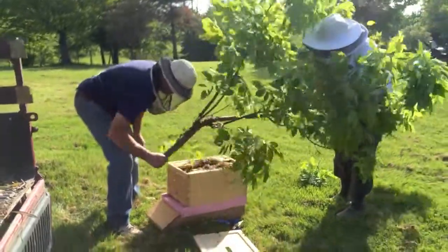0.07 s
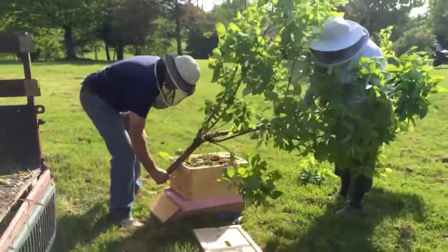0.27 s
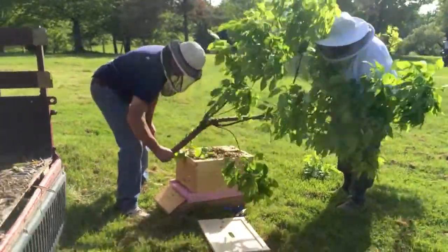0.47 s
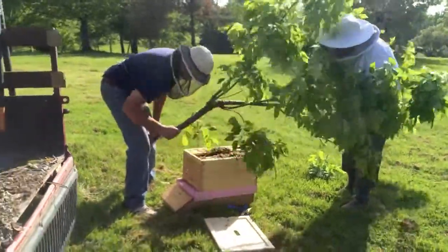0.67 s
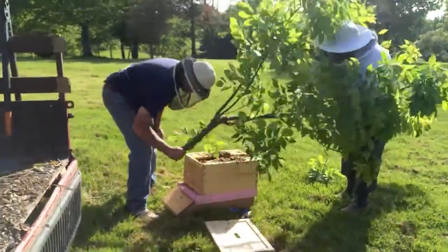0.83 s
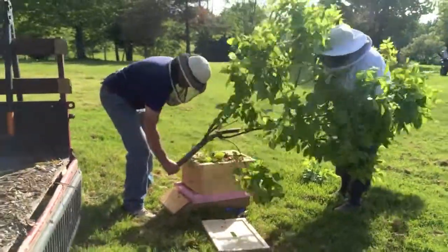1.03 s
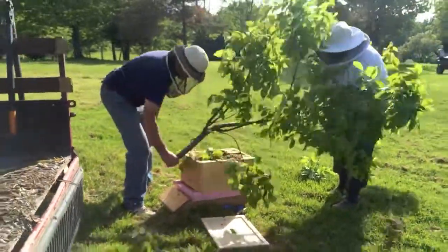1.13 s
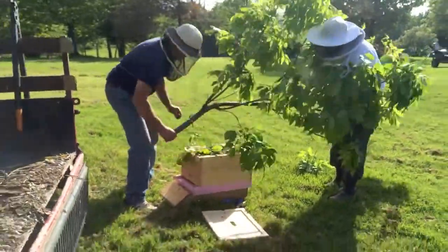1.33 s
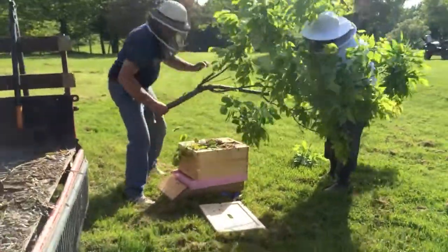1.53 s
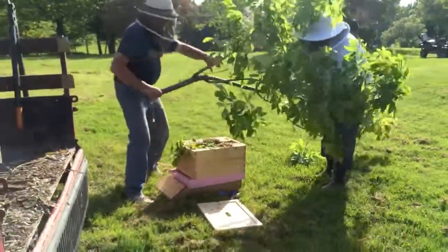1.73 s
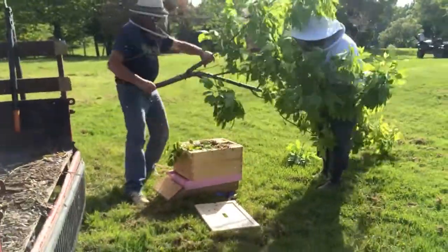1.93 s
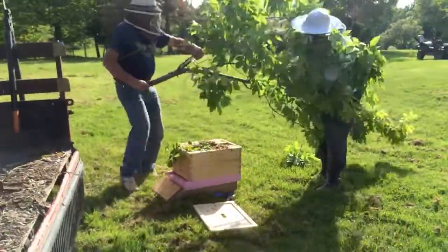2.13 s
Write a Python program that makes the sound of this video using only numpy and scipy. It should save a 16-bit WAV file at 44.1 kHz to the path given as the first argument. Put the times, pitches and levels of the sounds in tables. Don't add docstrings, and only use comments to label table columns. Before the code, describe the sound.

Two hard, hollow wooden knocks as a leafy branch is banged on a wooden box outdoors

```python
import sys
import numpy as np
from scipy import signal
from scipy.fft import rfft, irfft
from scipy.io import wavfile
from scipy.ndimage import uniform_filter1d

SR = 44100
rng = np.random.default_rng(int(sys.argv[2]) if len(sys.argv) > 2 else 0)


def voltage_ratio(level):
    return 10 ** (np.asarray(level, float) / 20)


def inscribe(sig):
    pcm = np.round(np.clip(np.atleast_2d(sig).T, -1, 1) * 32767)
    wavfile.write(sys.argv[1], SR, pcm.astype(np.int16))


N = 97020


def evened(x):
    return x / np.sqrt(np.mean(x ** 2) + 1e-20)


def noise():
    return rng.standard_normal(N)


def smooth_noise(count, width):
    return evened(uniform_filter1d(rng.standard_normal(count), size=width))


def curve(points):
    return np.interp(np.arange(N) / SR, *np.transpose(points))


def coloured(x, points):
    hz, db = np.transpose(points)
    f = np.fft.rfftfreq(len(x), 1 / SR)
    gain = voltage_ratio(np.interp(np.log(f + 1), np.log(hz + 1), db))
    return evened(irfft(rfft(x) * gain, len(x)))


def add(mix, s, sound):
    part = mix[round(s * SR):][:len(sound)]
    part += sound[:len(part)]


def fall(t, rise_s, t60):
    return (1 - np.exp(-t / max(rise_s, 1e-4))) * voltage_ratio(-60 * t / max(t60, .002))


def distant_trees():
    # freq_hz, level_db
    hiss_spectrum = [(15, -47), (25, -6.5), (193, -0.5), (368, -14), (399, -9.5), (495, -14), (1570, -19.5),
                     (2920, -21.5), (15500, -29)]
    # time_s, level_db
    breeze = [(0, 1.5), (.2, 0.5), (.6, 0.5), (.9, -1), (1.15, 1), (1.27, -3), (1.35, 1), (1.6, -1),
              (1.9, -2), (2.2, 1)]
    level_db, patch_depth_db = -44.5, 1.1
    real, imag, patches = rng.standard_normal((N // 256 + 5, 513, 3)).T
    patches = uniform_filter1d(patches, size=14, axis=0)
    patches = evened(uniform_filter1d(patches, size=10, axis=1))
    spectra = (real + 1j * imag) * voltage_ratio(patch_depth_db * patches)
    hiss = signal.istft(spectra, nperseg=1024, noverlap=768)[1][:N]
    return coloured(hiss, hiss_spectrum) * voltage_ratio(level_db + curve(breeze))


def wind_on_microphone():
    # freq_hz, level_db
    puff_spectrum = [(12, -56), (20, -29), (48, -11), (70, 2.5), (225, -23.5), (371, -25), (400, -75),
                     (520, -75), (880, -120)]
    # time_s, level_db
    gusts = [(0, -50.5), (.55, -61), (.64, -47.5), (.72, -53), (1.3, -67), (1.35, -41.5), (1.46, -40),
             (1.55, -51.5), (1.99, -58), (2.03, -51), (2.2, -36.5)]
    # crest_s, level_db, pitch_hz, half_width_s
    swirls = [
        (1.36, -33.5, 64.3, 0.01),
        (1.426, -30.5, 89, 0.0032),
        (2.02, -31, 85, 0.0048),
        (2.05, -26, 113.4, 0.0057),
        (2.069, -20.5, 77, 0.0085),
        (2.083, -19, 154, 0.0024),
        (2.099, -22.5, 62, 0.007),
        (2.117, -24, 70, 0.0063),
        (2.157, -28, 92, 0.0055),
        (2.192, -18.5, 89.5, 0.0039),
    ]
    lumps = voltage_ratio(4.7 * smooth_noise(N, 600))
    out = evened(coloured(noise(), puff_spectrum + [(700, -70)]) * lumps) * voltage_ratio(curve(gusts))
    for crest_s, db, hz, half_width_s in swirls:
        t = np.arange(N) / SR - crest_s
        out += voltage_ratio(db) * np.exp(-(t / half_width_s) ** 2 / 2) * np.cos(2 * np.pi * hz * t)
    return out


def branch_swish():
    # freq_hz, level_db
    swish_spectrum = [(180, -51), (300, -14.5), (800, 0.5), (1140, -2.5), (1600, -3), (2200, -14.5),
                      (3900, -43), (6600, -120)]
    # time_s, level_db
    carry = [(0, -60), (.5, -57.5), (.62, -55), (.9, -55.5), (1.27, -66), (1.34, -52.5), (1.49, -56.5),
             (1.53, -48.5), (1.61, -54.5), (1.67, -49.5), (1.73, -53), (1.83, -52), (1.9, -53.5),
             (1.95, -52.5), (2.2, -57.5)]
    patches = voltage_ratio(2.2 * smooth_noise(N, 700))
    rustle = coloured(noise(), [(150, -45.5)] + swish_spectrum + [(5000, -54.5)])
    return evened(rustle * patches) * voltage_ratio(curve(carry))


def bird():
    # start_s, length_s, from_hz, to_hz, level_db
    chirps = [
        (.005, .09, 2720, 3290, -56.5),
        (.115, .035, 3280, 3120, -61),
    ]
    flutter_hz, echo_s, echo_db = 90, .017, -9
    out = np.zeros(N)
    for start_s, length_s, from_hz, to_hz, db in chirps:
        u = np.arange(0, length_s, 1 / SR) / length_s
        waver = smooth_noise(len(u), 200)
        flutter = smooth_noise(len(u), 200)
        hz = from_hz + (to_hz - from_hz) * u + flutter_hz * u ** 2 * flutter
        swell = 2 * voltage_ratio(db + 1.5 * waver) * np.sin(np.pi * u ** .8)
        note = swell * np.sin(2 * np.pi * np.cumsum(hz) / SR)
        add(out, start_s, note)
        add(out, start_s + echo_s, voltage_ratio(echo_db) * note)
    return out


def thuds():
    # crest_s, thud_db, thud_hz, thud_width_s
    blows = [
        (.2519, 1.5, 216, .0052),
        (1.0014, 3, 217, .0052),
    ]
    lead_s, swell_db_per_s = .002, 2600
    brush_db, brush_db_per_s = -22, 700
    push_db, push_hz, push_width_s, push_early_s = -13, 82, 0.0059, 0.0029
    out = np.zeros(N)
    for crest_s, db, hz, width_s in blows:
        t = np.arange(N) / SR - crest_s
        after, before = np.maximum(t, 0), np.minimum(t + lead_s, 0)
        thud = voltage_ratio(db) * np.exp(-(after / width_s) ** 4 / 2) * np.cos(2 * np.pi * hz * t)
        swell = np.maximum(voltage_ratio(swell_db_per_s * before), voltage_ratio(brush_db + brush_db_per_s * before))
        push = np.exp(-((t + push_early_s) / push_width_s) ** 2 / 2) * np.cos(2 * np.pi * push_hz * t)
        out += swell * thud + voltage_ratio(push_db) * push
    return out


def rim_contact(db, tilt_db, t60, crack_db, panels):
    # freq_hz, level_db
    crack_spectrum = [(820, -29), (1400, -6), (5840, -11.5), (6460, -10.5), (7070, -14.5), (7740, -12.5),
                      (15500, -32)]
    chatter_per_s, ring_share = 1500, 0.61
    slat_db, slat_tilt_db, slat_t60, slat_top_hz = -12.5, -5.5, 0.04, 830
    t = np.arange(8000) / SR
    slips = (rng.random(len(t)) < chatter_per_s / SR) * rng.choice([-.5, .5], len(t)) * voltage_ratio(-60 * t / t60)
    slips[0] = 1
    spread = (np.arange(90) + rng.random(90)) / 90
    slats = [(hz, slat_db + slat_tilt_db * abs(np.log2(hz / slat_top_hz)), slat_t60)
             for hz in 400 * 12 ** spread]
    ring = np.zeros(len(t))
    for hz, mode_db, mode_t60 in panels + slats:
        level = voltage_ratio(mode_db + tilt_db * np.log2(hz / 1000) - 60 * t / (mode_t60 * ring_share))
        ring += level * np.sin(2 * np.pi * hz * t) * rng.choice([-1, 1])
    body = signal.fftconvolve(2 * slips / np.linalg.norm(slips), ring * fall(t, 0.0005, 7.7))[:len(t)]
    body = signal.sosfilt(signal.butter(2, 330, "high", fs=SR, output="sos"), body)
    crack = coloured(rng.standard_normal(len(t)), crack_spectrum) * fall(t, 0.0038, .021)
    return voltage_ratio(db) * body + voltage_ratio(crack_db) * crack


def box_rattle():
    # start_s, level_db, hardness_db_per_octave, chatter_t60_s, crack_db
    contacts = [(0.236, -41.5, 6.5, 0.049, -36), (0.245, -15.5, 1, 0.059, -7.5),
                (0.25, -15, -2, 0.052, -29), (.258, -17, -1, 0.036, -28), (0.266, -18, 0.5, 0.044, -26),
                (.273, -19.5, 2.5, 0.058, -32), (.281, -32, -9, 0.23, -44), (.317, -33, -4, 0.11, -40),
                (.350, -45, -2, 0.047, -39), (0.985, -35.5, -0.5, 0.042, -31), (.9940, -17, 3, 0.045, -6.5),
                (0.999, -15.5, -0.5, 0.071, -27), (1.017, -20, 1.5, 0.053, -20),
                (1.024, -24.5, 1.5, 0.08, -21), (1.043, -39.5, -3.5, 0.098, -45),
                (1.062, -35, -4, 0.086, -49), (1.095, -46, -4, 0.081, -47), (1.005, -21.5, 0, .05, -36),
                (1.033, -31.5, -1, .08, -42), (1.052, -42, 2, 0.064, -48), (.290, -39, 2, .09, -44)]
    # pitch_hz, level_db, t60_s
    first_panels = [(485, -12.5, 0.1), (731, -8.5, 0.05), (1040, -2, 0.038), (1257, -2, 0.032),
                    (1726, -5, 0.038), (2126, -7.5, 0.044), (2400, -13, 0.038), (2980, -38, 0.024),
                    (3640, -37, 0.022), (4440, -24, 0.018)]
    # pitch_hz, level_db, t60_s
    second_panels = [(434, -7, 0.058), (497, -3.5, 0.064), (585, -7.5, 0.053), (820, 3.5, 0.037),
                     (1050, -4, 0.069), (1190, -9.5, 0.077), (1720, 1.5, 0.02), (1933, -4, 0.03),
                     (2620, -24, 0.041), (4500, -19, 0.023)]
    out = np.zeros(N)
    for start_s, *touch in contacts:
        panels = first_panels if start_s < .7 else second_panels
        add(out, start_s, rim_contact(*touch, panels))
    return out


def twig_ticks():
    # start_s, level_db, pitch_hz, t60_s, snap_db
    ticks = [(.262, -17, 1040, 0.059, -60), (.270, -15.5, 1107, 0.025, -60),
             (1.045, -30.5, 785, 0.036, -60), (.317, -29, 1280, 0.036, -60), (.318, -35, 875, 0.073, -60),
             (.2455, -24.5, 5030, 0.016, -60), (.9955, -16, 820, 0.07, -62),
             (1.012, -20.5, 1050, 0.07, -60), (0.2373, -42, 12600, 0.033, -23),
             (0.2424, -42, 13500, 0.0214, -27), (0.8317, -32, 6880, 0.0057, -41),
             (.8322, -39, 4300, 0.0046, -60), (1.017, -25, 3423, 0.055, -36), (1.0175, -31, 3900, .05, -60),
             (1.018, -32, 2620, 0.035, -60), (1.064, -36.5, 1620, 0.039, -60), (1.064, -43, 2013, .07, -60),
             (1.342, -44, 5650, .008, -48), (1.418, -42, 9050, 0.0068, -39), (1.445, -52, 8000, .006, -41),
             (1.762, -44.5, 1560, 0.034, -60), (2.022, -37.5, 2400, 0.013, -49),
             (2.0217, -38, 1580, 0.0074, -50)]
    out, t = np.zeros(N), np.arange(6000) / SR
    for start_s, db, hz, t60, snap_db in ticks:
        ring = 2 * voltage_ratio(db) * fall(t, 0.00038, t60) * np.sin(2 * np.pi * hz * t)
        snap = voltage_ratio(snap_db) * rng.standard_normal(len(t)) * fall(t, 0.00066, 0.015)
        add(out, start_s, ring + snap)
    return out


def hollow_rings():
    # crest_s, level_db, pitch_hz, t60_s, damped_after_s
    rings = [(.2636, -3.5, 207, .16, .051), (.3223, -25, 228, .09, .012), (.250, -19, 730, .14, .04),
             (.262, -24, 600, .14, .05), (.278, -24, 500, .1, .03), (.336, -34, 480, .12, .04),
             (1.011, -20, 500, .09, .035), (.3384, -29, 190, .1, .004), (.3451, -28, 165, .12, .006),
             (.3589, -35, 225, .1, .012), (1.051, -27, 155, .15, .04), (1.0102, -15, 290, .06, .006),
             (.2476, -10, 355, .2, .004), (.2545, -6, 362, .075, .03), (.300, -29, 367, .1, .008),
             (.3155, -30, 364, .1, .02), (.9950, -7, 348, .085, .035), (1.0173, -12.5, 238, .1, .019),
             (1.0455, -17, 188, .12, .013), (1.0637, -25, 215, .1, .005), (1.0679, -24, 372, .08, .012),
             (1.0786, -22, 216, .06, .007), (1.035, -26, 415, .08, .008), (1.094, -33, 222, .1, .02)]
    rise_s, damp_db_per_s = .002, 1600
    out = np.zeros(N)
    for crest_s, db, hz, t60, damped_s in rings:
        t = np.arange(N) / SR - crest_s
        rise = np.exp(-(np.minimum(t, 0) / rise_s) ** 2 / 2)
        damping_db = damp_db_per_s * np.maximum(t - damped_s, 0)
        decay = voltage_ratio(db - 60 * np.maximum(t, 0) / t60 - damping_db)
        out += rise * decay * np.cos(2 * np.pi * hz * t)
    return out


def shaken_leaves():
    # freq_hz, level_db
    leaf_spectrum = [(880, 6.5), (1500, 8), (2830, -1.5), (4020, 3.5), (13400, -7.5), (15500, -4)]
    # start_s, level_db, rise_s, t60_s
    shakes = [
        (0.248, -29, 0.012, 0.35),
        (.43, -37, 0.0077, 0.043),
        (.60, -42.5, 0.018, 0.36),
        (0.998, -31, 0.0078, 0.36),
        (1.31, -38.5, 0.016, 0.15),
        (1.417, -42, 0.0046, 0.1),
        (1.444, -40, .003, 0.042),
        (2.019, -41, 0.037, 0.41),
    ]
    t, level = np.arange(N) / SR, np.zeros(N)
    for start_s, db, rise_s, t60 in shakes:
        add(level, start_s, voltage_ratio(db) * fall(t, rise_s, t60))
    grain = voltage_ratio(1.7 * smooth_noise(N, 150))
    return level * evened(coloured(noise(), leaf_spectrum) * grain)


def scene():
    field = distant_trees() + wind_on_microphone() + bird()
    box = thuds() + box_rattle() + hollow_rings()
    branch = branch_swish() + twig_ticks() + shaken_leaves()
    return (field + box + branch)[None]


def roll_off(x):
    return signal.sosfilt(signal.butter(12, 15810, fs=SR, output="sos"), x)


def record(dry):
    low_cut = signal.sosfilt(signal.butter(1, 30, "high", fs=SR, output="sos"), dry)
    top_cut = signal.firwin(401, 15280, window=("kaiser", 9), fs=SR)
    band = signal.oaconvolve(low_cut, top_cut[None], "same")
    return roll_off(np.clip(band, -1, 1))


dry = scene()
out = record(dry)
inscribe(out)
```